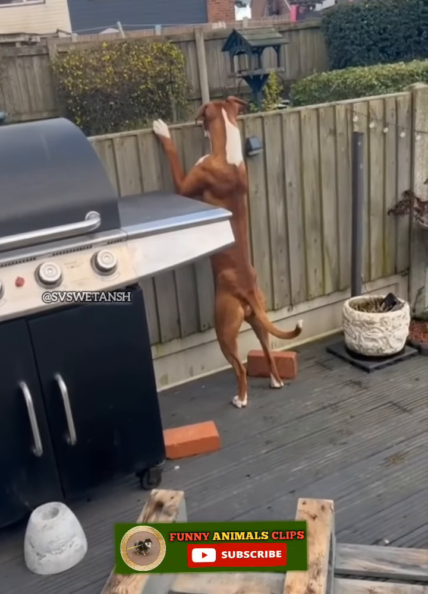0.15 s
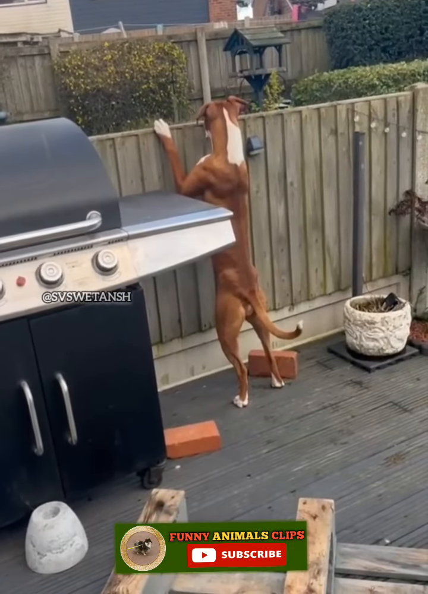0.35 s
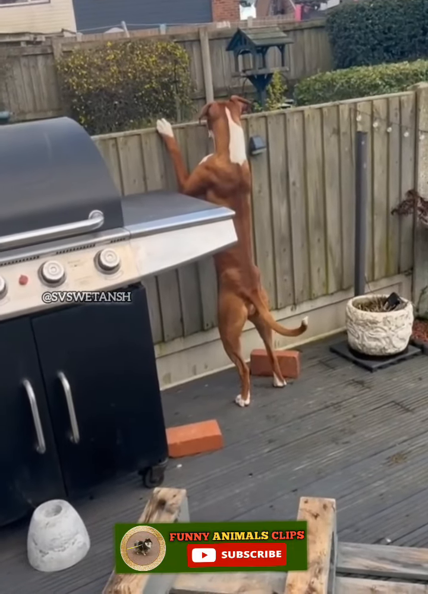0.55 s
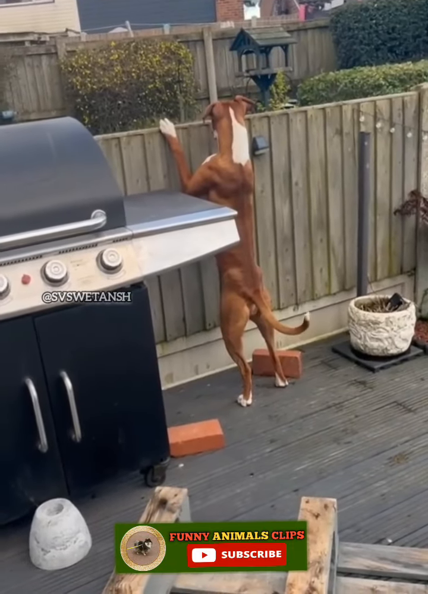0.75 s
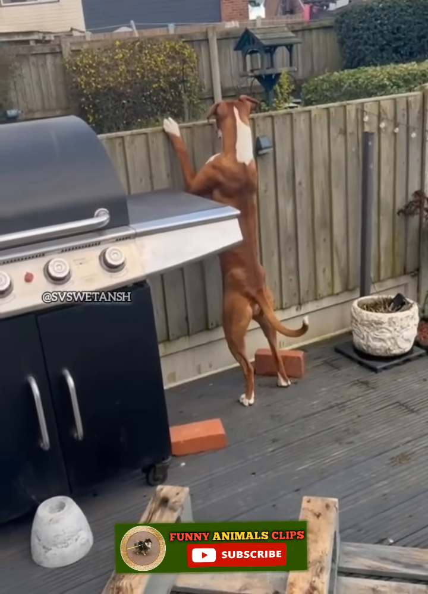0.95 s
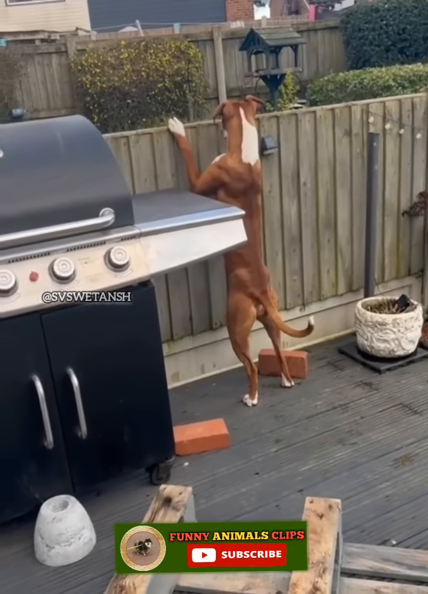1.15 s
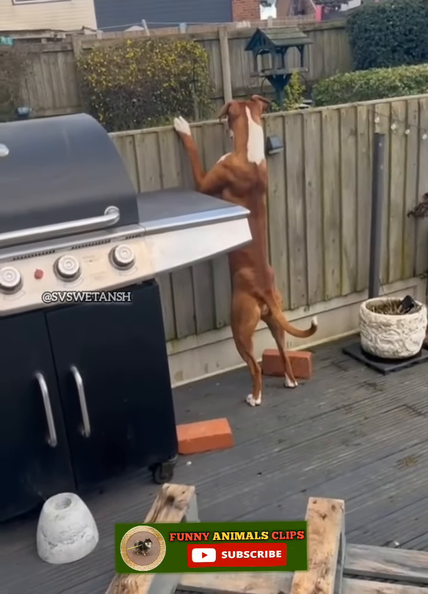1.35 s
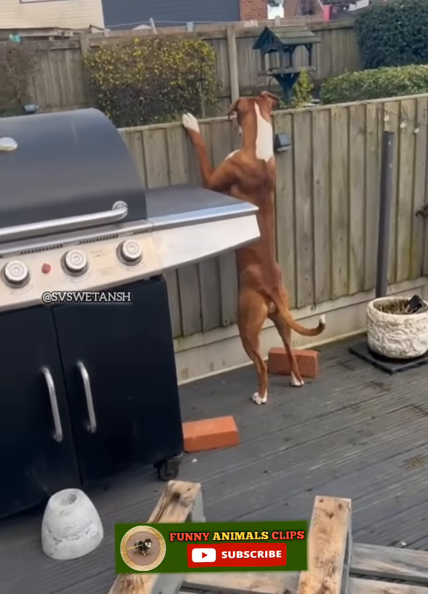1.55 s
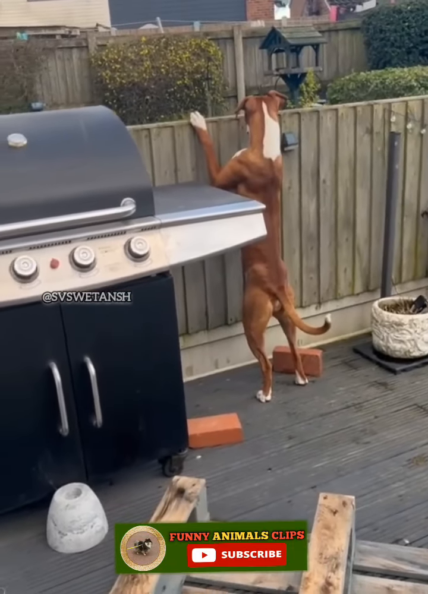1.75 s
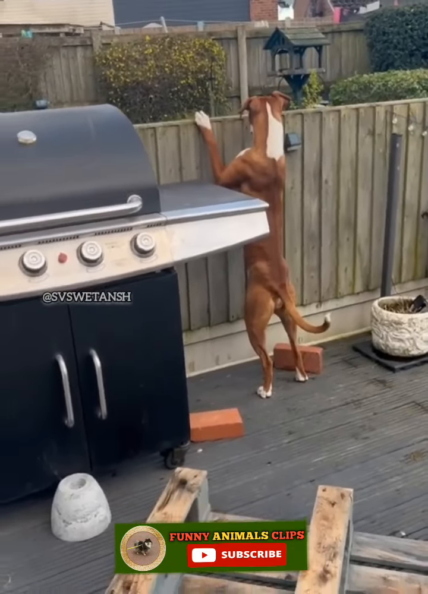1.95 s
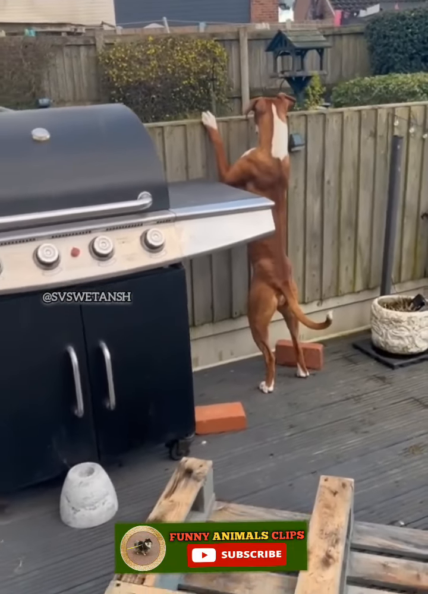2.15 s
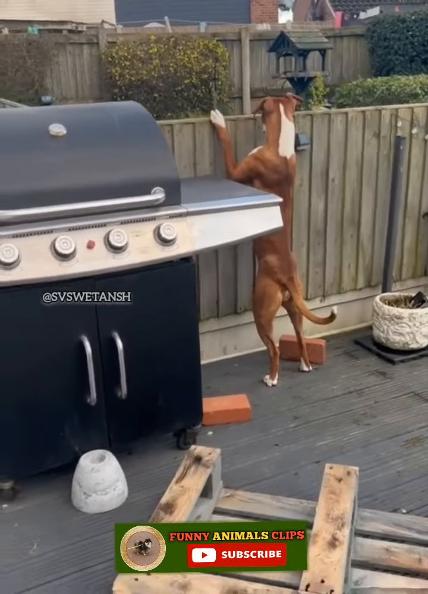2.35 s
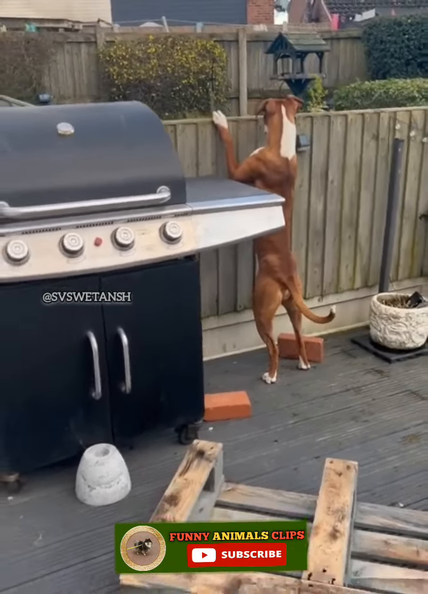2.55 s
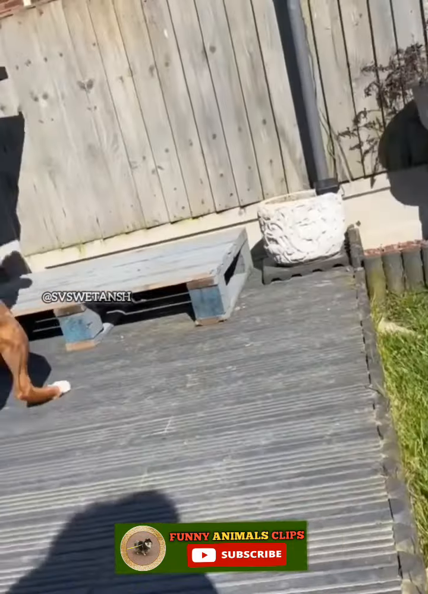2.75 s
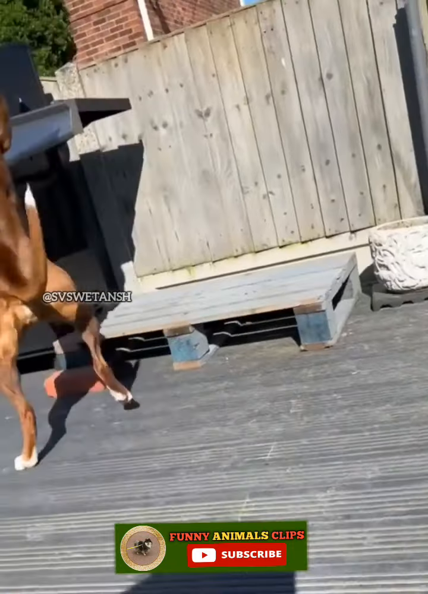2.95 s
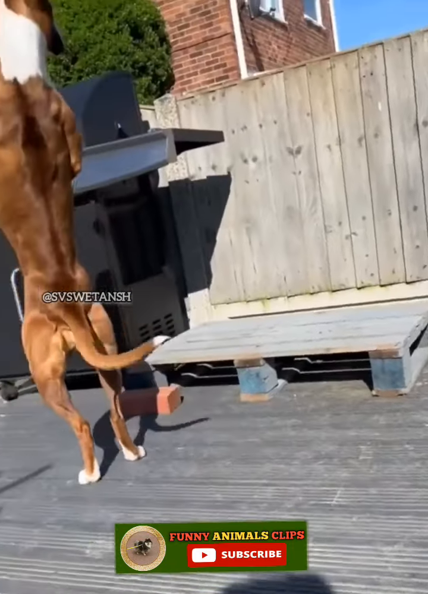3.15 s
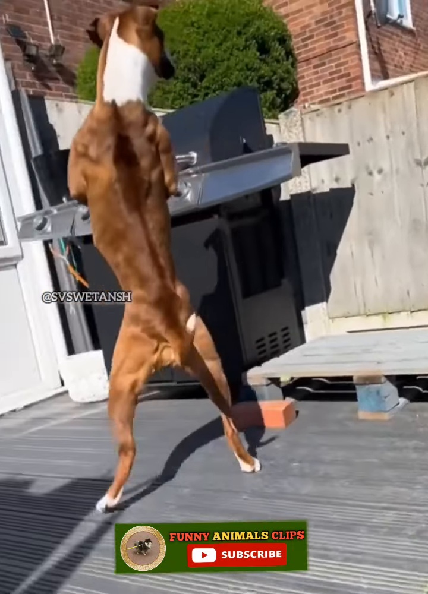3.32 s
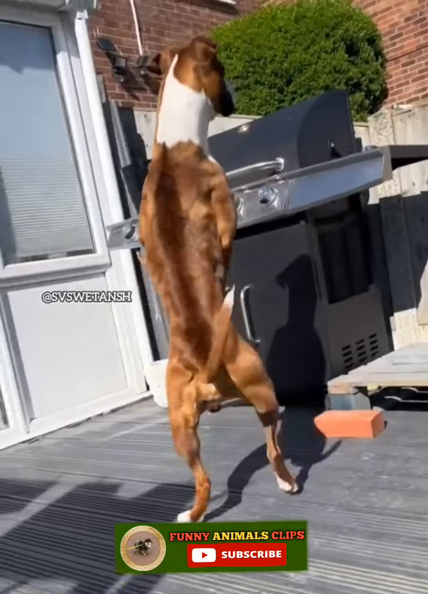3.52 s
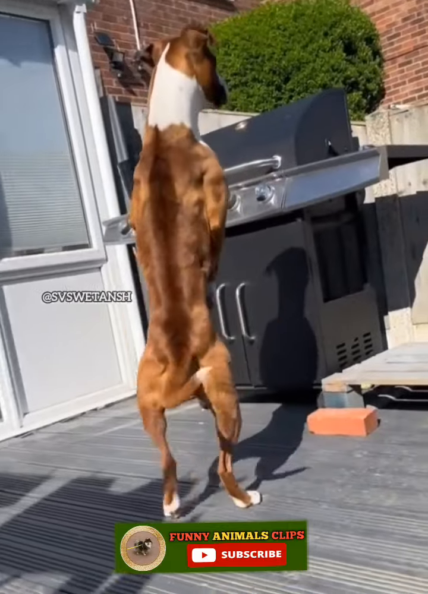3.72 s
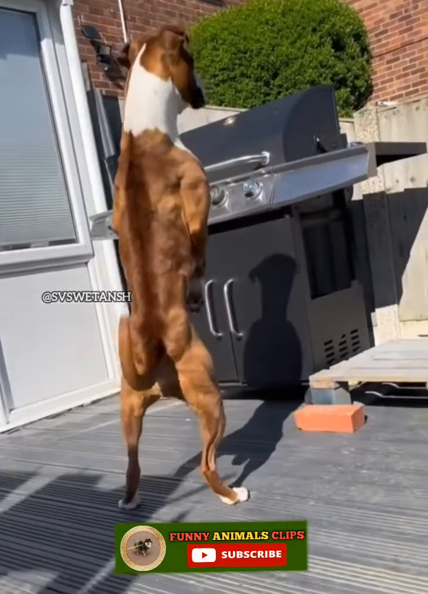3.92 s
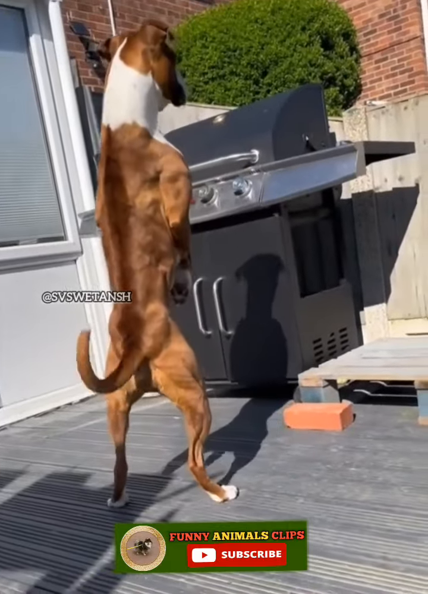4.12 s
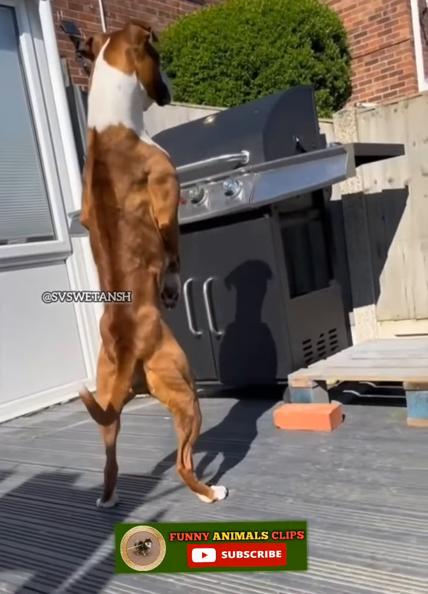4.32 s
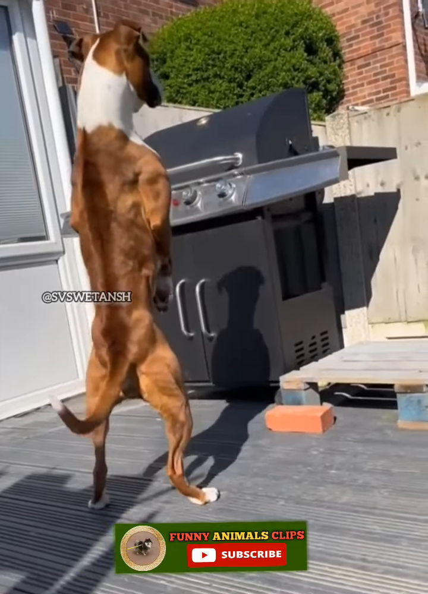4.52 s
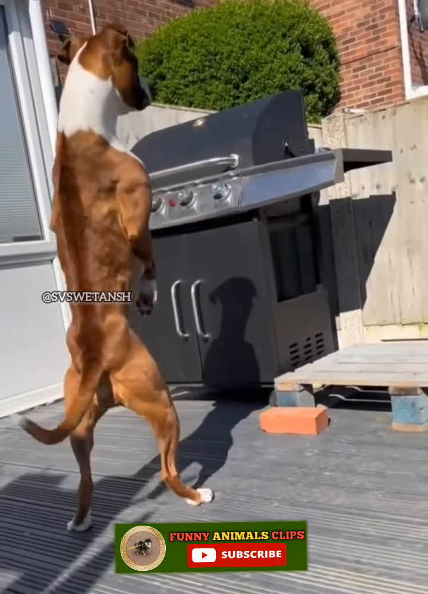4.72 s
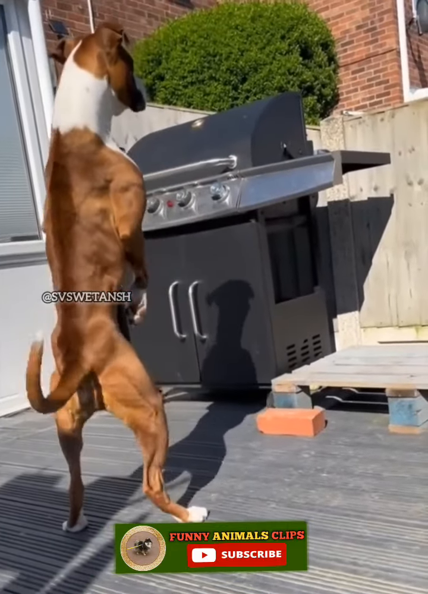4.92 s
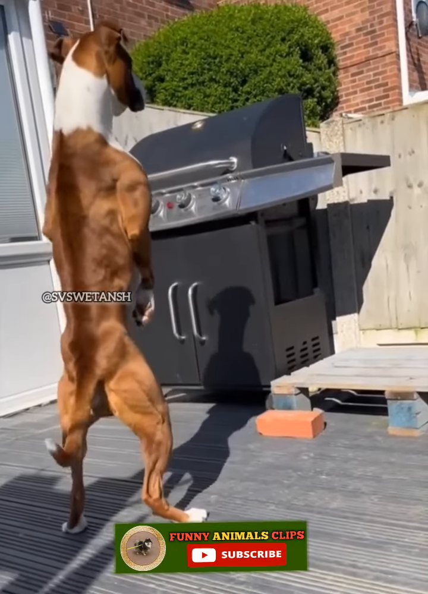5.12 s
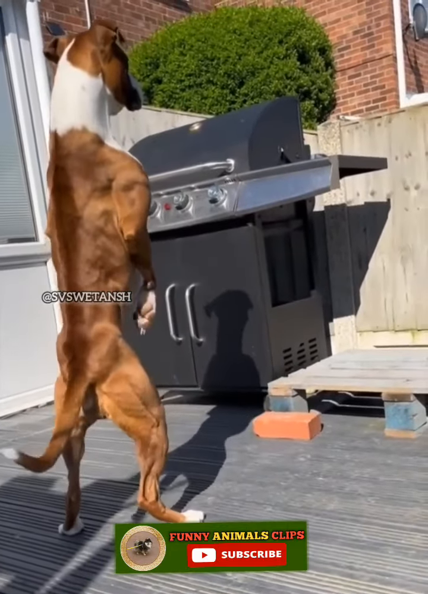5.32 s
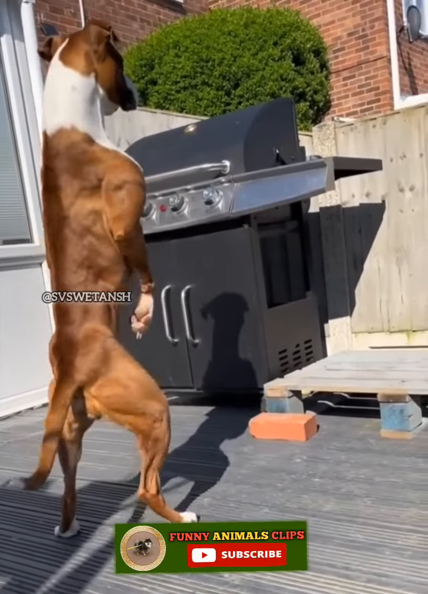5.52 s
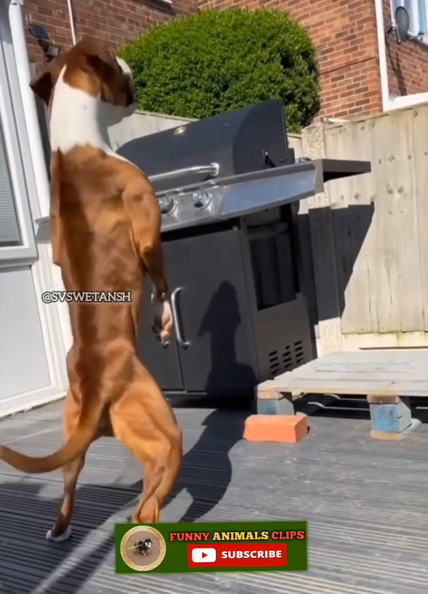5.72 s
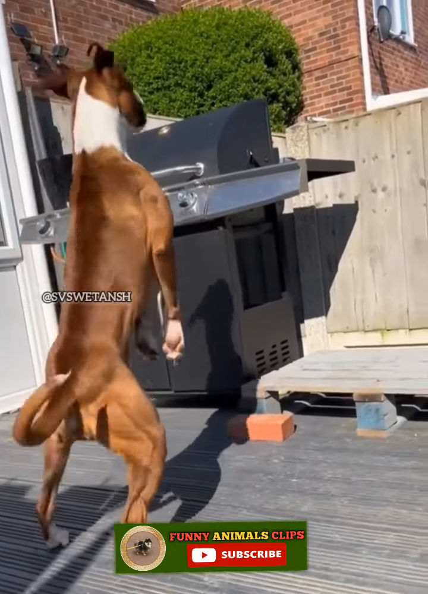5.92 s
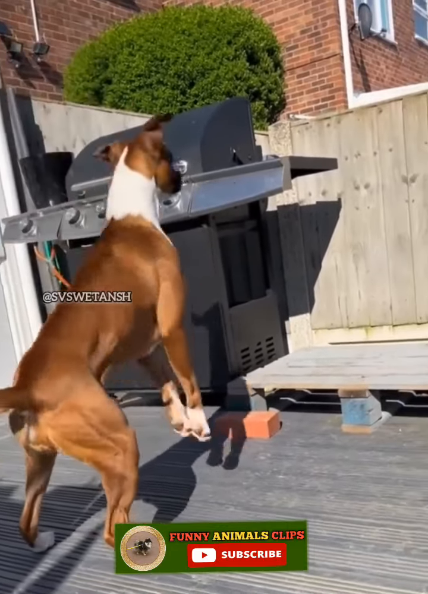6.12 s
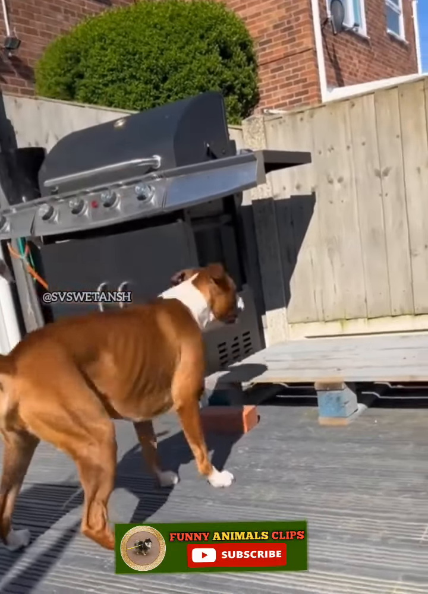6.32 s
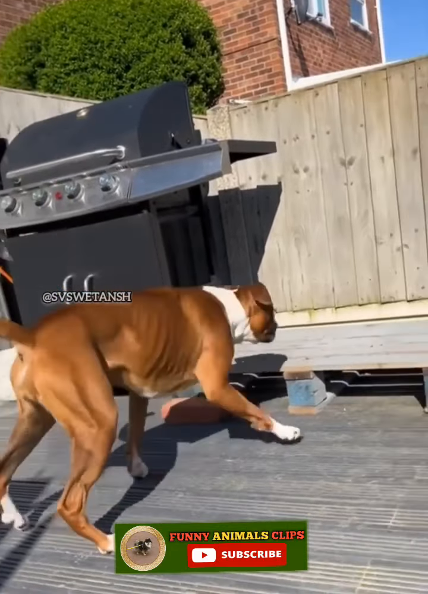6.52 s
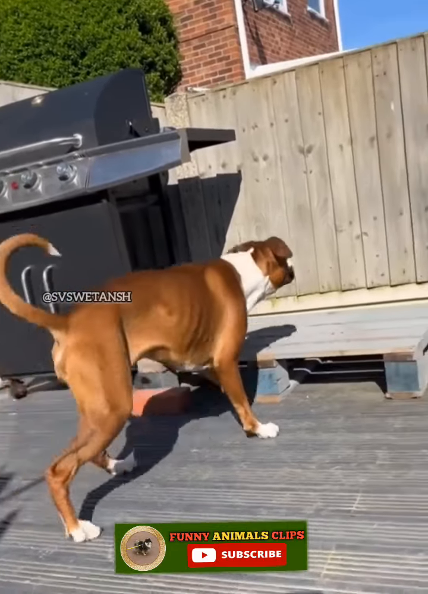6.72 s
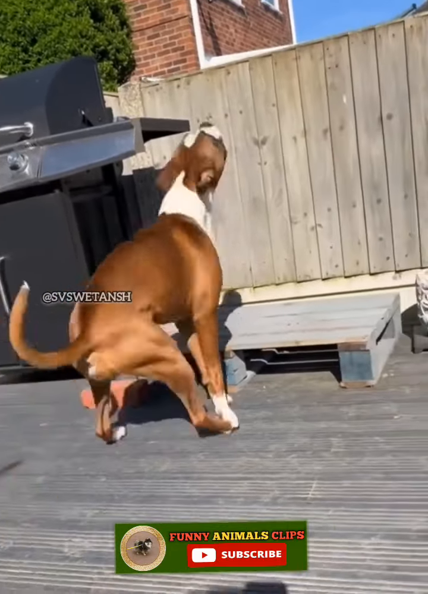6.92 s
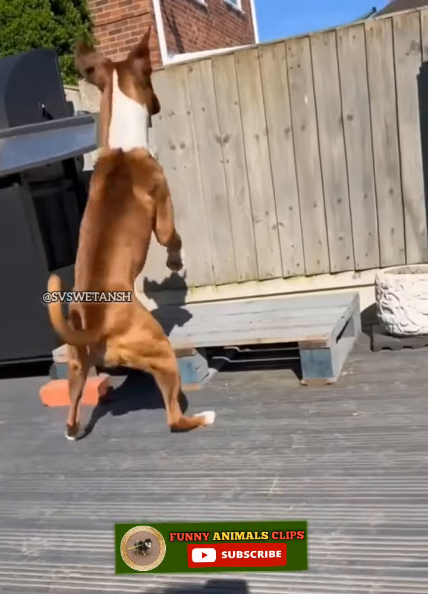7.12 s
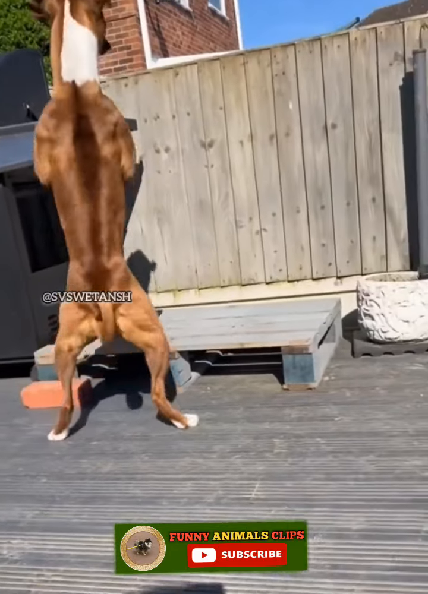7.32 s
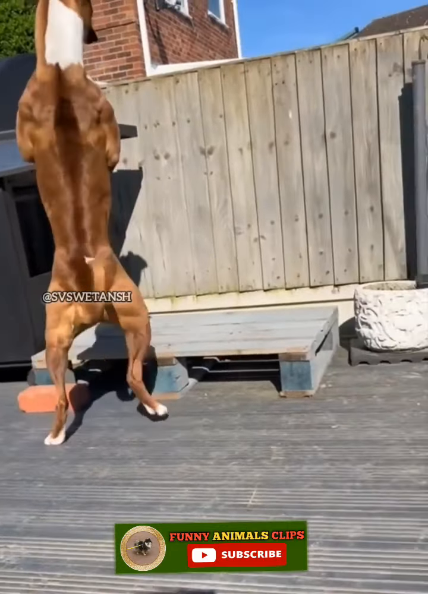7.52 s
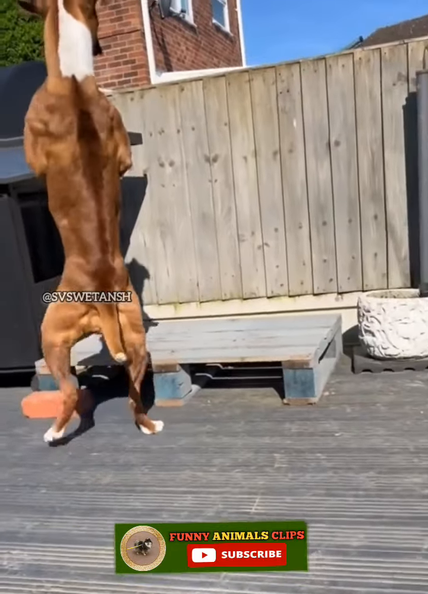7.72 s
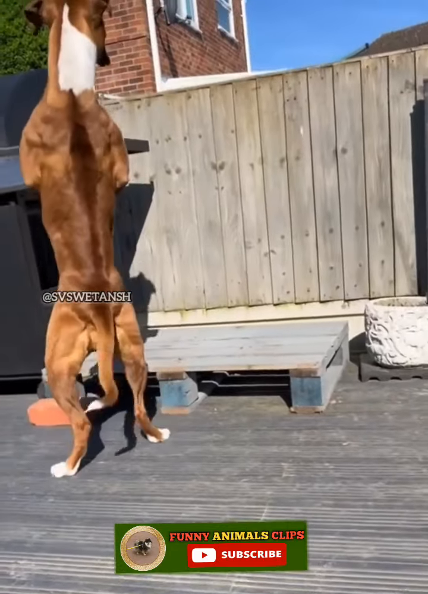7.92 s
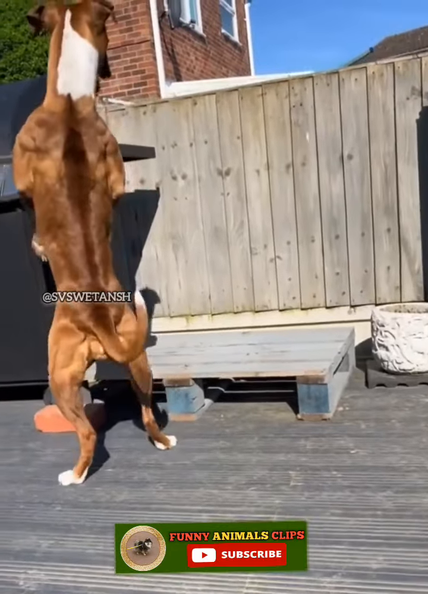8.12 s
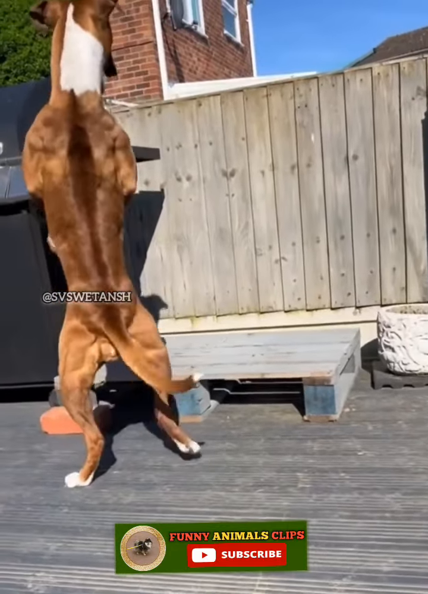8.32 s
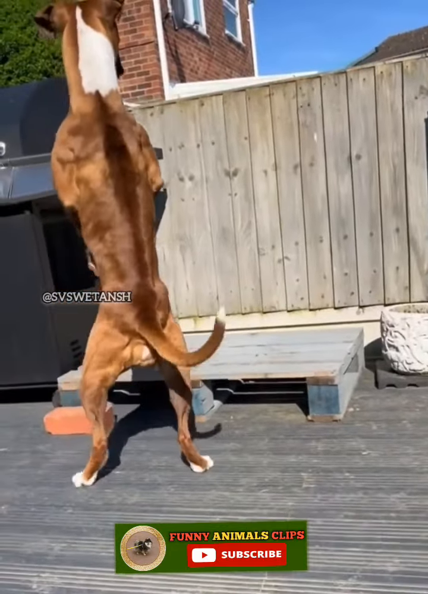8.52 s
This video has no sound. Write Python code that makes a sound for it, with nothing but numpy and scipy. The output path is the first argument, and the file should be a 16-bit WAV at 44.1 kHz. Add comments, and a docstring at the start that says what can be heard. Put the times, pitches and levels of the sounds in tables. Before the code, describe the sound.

Distant falling bird whistles and a soft wind rumble accompany light paw taps and scrapes on wood. After a short dip to silence, a nearby dog clatters and thuds across deck boards over a quiet steady hum. A muffled woof and a few breathy huffs lead to two loud barks about a second apart, then more steps, a softer woof and a huff. The yard adds a short echo.

```python
"""A dog stands on its hind legs on a wooden garden deck. First it peers over the fence, paws tapping and
scuffing, while birds whistle and buzz in a light breeze. After a gust the sound fades out and returns
by the house, over a low hum. There the dog hops about, claws clacking and boards booming, gives a muffled
woof and hoarse huffs, then barks twice, loudly. One more woof and a huff come among the last heavy steps.
Fence and house wall answer throughout."""
import sys
import numpy as np
from scipy import signal
from scipy.fft import rfft, irfft, next_fast_len
from scipy.io import wavfile
from scipy.ndimage import uniform_filter1d, map_coordinates

SR = 44100
rng = np.random.default_rng(int(sys.argv[2]) if len(sys.argv) > 2 else 0)


def inscribe(sig):
    """Save sig as 16-bit PCM at rate SR to the path in sys.argv[1].

    A 1-D sig is mono; a 2-D sig holds one channel per row.
    Samples are clipped to [-1, 1] before scaling.
    """
    pcm = np.round(np.clip(np.atleast_2d(sig).T, -1, 1) * 32767)
    wavfile.write(sys.argv[1], SR, pcm.astype(np.int16))


N = 381603
TIME = np.arange(N) / SR
YARD_START_S = 2.7  # the second scene, by the house, begins
# spectrum of a sharp snap on wood: (frequency [Hz], level [dB])
SNAP = [(500, -15), (1200, -3), (4000, 1.5), (8000, -4.5), (14000, -28)]


def amp(db):
    """Decibels to gain."""
    return 10 ** (np.asarray(db) / 20)


def unit(x):
    """Scale to rms 1."""
    return x / np.sqrt(np.mean(x ** 2) + 1e-20)


def along(points, hz):
    """Read (Hz, value) points on a log frequency axis."""
    f, v = np.transpose(points)
    return np.interp(np.log(hz + 1), np.log(f + 1), v)


def wobble(rate, size):
    """A smooth random curve with `rate` knots a second."""
    knots = rng.standard_normal(int(size * rate / SR) + 4)
    return map_coordinates(knots, [np.arange(size) * rate / SR])


def filtered(x, response):
    """Equalise x by a gain given as a function of frequency."""
    n = x.shape[-1]
    m = next_fast_len(n + 8192)
    return irfft(rfft(x, m) * response(np.fft.rfftfreq(m, 1 / SR)), m)[..., :n]


def dull(x, edge_hz):
    """Low-pass: a softer contact loses its treble."""
    return filtered(x, lambda f: 1 / np.sqrt(1 + (f / edge_hz) ** 4))


def resonate(x, modes):
    """Pass x through steep-sided resonances: (centre [Hz], width [Hz], gain [dB])."""
    return filtered(x, lambda f: sum(amp(db) * (1j * f * w / (c * c - f * f + 1j * f * w)) ** 2
                                     for c, w, db in modes))


def noise(spectrum, size):
    """Coloured noise of rms 1."""
    return unit(filtered(rng.standard_normal(size), lambda hz: amp(along(spectrum, hz))))


def band(centre_hz, width_hz, size):
    """A noise band of rms 1 around a centre that may move."""
    phase = 2 * np.pi * np.cumsum(centre_hz * np.ones(size)) / SR
    return unit(wobble(width_hz, size) * np.sin(phase) + wobble(width_hz, size) * np.cos(phase))


def stereo_bed(spectrum, side_db):
    """Full-length stereo noise, mostly alike in both ears."""
    mid, side = noise(spectrum, N), amp(side_db) * noise(spectrum, N)
    return unit(np.array([mid + side, mid - side]))


def add(track, s, x):
    """Mix x into the track from time s."""
    start = max(0, round(s * SR))
    part = track[..., start:start + x.shape[-1]]
    part += x[..., :part.shape[-1]]


def garden(x, near_db, far_db, side_db, linger=1):
    """Deck and fence answer at once; the houses around leave a tail, which lingers for far sources."""
    # tone of the tail: (frequency [Hz], level [dB])
    colour = [(200, 9), (420, 4.5), (600, -3), (800, 2), (1400, 0), (2300, 3.5), (4000, 3), (12000, -1.5)]
    # decay of the tail at linger=1: (frequency [Hz], t60 [s])
    decay = [(100, 1), (500, 0.53), (1500, 0.64), (4000, 0.66), (12000, 0.51)]
    hz, t, spectra = signal.stft(rng.standard_normal((2, SR * 3 // 4)), SR, nperseg=256)
    tail_db = along(colour, hz)[:, None] - 60 * t / (linger * along(decay, hz)[:, None])
    tail = signal.istft(spectra * amp(tail_db), SR, nperseg=256)[1]
    t = np.arange(tail.shape[1]) / SR
    tail *= 1 - np.exp(-t / 0.011)
    near = rng.standard_normal(tail.shape) ** 3 * amp(-60 * t / 0.15) * (t > .003)
    answer = amp(near_db) * near / np.linalg.norm(near[0]) + amp(far_db) * tail / np.linalg.norm(tail[0])
    mid, side = signal.fftconvolve(x[None], answer, axes=1)[:, :N]
    # short waves differ more between left and right: (frequency [Hz], side gain [dB])
    width = [(150, -32), (600, -3), (3000, -2.5), (10000, 3.5)]
    side = filtered(side, lambda f: amp(side_db + along(width, f)))
    return np.array([x + mid + side, x + mid - side])


def breeze():
    """A light breeze rumbles and swells in one gust."""
    # wind rumble: (frequency [Hz], level [dB])
    spectrum = [(13, -43), (22, -9), (60, 8.5), (91, -0.5), (129, 0.5), (198, -8.5), (285, -12.5),
                (400, -40), (520, -73), (880, -120)]
    gust_db = 12.5 * np.exp(-((TIME - 2.147) / 0.21) ** 2)
    return amp(-53.5 + gust_db + 2.6 * wobble(14, N)) * stereo_bed(spectrum, side_db=-17)


def distant_rush():
    """A wide, far-off rush that ebbs unevenly."""
    # tone of the rush: (frequency [Hz], level [dB])
    spectrum = [(120, -70), (200, 2.5), (500, 0), (1000, -2.5), (2000, -12), (3500, -19.5), (6500, -26),
                (9000, -29.5), (13500, -40), (15500, -46)]
    # its envelope: (time [s], level [dB])
    envelope = [(0, -51), (.35, -52), (.7, -53), (1, -50.5), (1.35, -59), (2.1, -55), (2.45, -61)]
    db = np.interp(TIME, *np.transpose(envelope)) + 0.11 * wobble(36, N)
    return amp(db) * stereo_bed(spectrum, side_db=-6)


def yard_air():
    """The low, almost mono ambience of the sheltered yard."""
    # tone of the yard: (frequency [Hz], level [dB])
    spectrum = [(22, -26.5), (50, 4.5), (75, 6), (160, -2.5), (300, -5.5), (600, -16), (1200, -28),
                (2500, -41.5), (5000, -46), (14000, -57.5)]
    # its envelope: (time [s], level [dB])
    envelope = [(2.7, -57.5), (3.1, -49.5), (4.3, -51.5), (5.5, -54.5), (7.7, -53), (8.65, -45.5)]
    db = np.interp(TIME, *np.transpose(envelope)) + 1.7 * wobble(11, N)
    return amp(db) * stereo_bed(spectrum, side_db=-30)


def machine_hum():
    """A machine's steady hum swells in as the yard scene opens."""
    # harmonics: (multiple of the pitch, level [dB])
    harmonics = [(1, 3), (2, -11.5), (3, -22.5)]
    pitch_hz, swell_s = 118.2, 0.87
    phase = 2 * np.pi * np.cumsum(pitch_hz * (1 + 0.0025 * wobble(1.1, N))) / SR
    swell = np.clip((TIME - YARD_START_S) / swell_s, 0, 1)
    return amp(-54) * swell * sum(amp(db) * np.sin(k * phase) for k, db in harmonics)


def birds():
    """Gliding, mostly falling whistles with a hoarse edge, and buzzes among them."""
    # whistles: (start [s], length [s], opening pitch [Hz], closing pitch [Hz], level [dB])
    whistles = [(0.528, 0.35, 2550, 1680, -60), (1.033, .63, 4043, 1953, -54),
                (1.741, .5, 3960, 1750, -51.5), (2.344, 0.07, 2715, 2960, -53.5),
                (5.37, 0.29, 2320, 2193, -66), (6.078, 0.22, 2570, 2265, -71),
                (7.168, 0.15, 2020, 1974, -63)]
    # buzzy notes: (middle [s], length [s], centre [Hz], half-width [Hz], level [dB])
    buzzes = [(0.022, 0.04, 3380, 250, -57), (0.443, 0.32, 6670, 447, -63), (0.578, 0.19, 7840, 250, -67.5),
              (0.621, 0.21, 8800, 276, -64.5), (0.829, 0.2, 4320, 820, -56.5),
              (1.601, 0.079, 4350, 985, -62), (1.772, 0.13, 3630, 1280, -54),
              (2.027, 0.26, 8130, 350, -71.5), (2.145, 0.21, 4700, 450, -60), (2.362, 0.73, 4500, 706, -70)]
    hold, attack = 0.072, 0.19  # shares of a whistle: opening pitch held, level rising
    track = np.zeros(N)
    for s, length, start_hz, end_hz, level_db in whistles:
        n = int(length * SR)
        progress = np.linspace(0, 1, n)
        hz = start_hz * (end_hz / start_hz) ** np.interp(progress, [hold, 1], [0, 1])
        rise_db = np.interp(progress, [0, attack], [-10, 0])
        fall_db = -12 * np.interp(progress, [attack, 1], [0, 1]) ** 2
        phase = 2 * np.pi * np.cumsum(hz * (1 + .009 * wobble(220, n))) / SR
        tremble_db = 2.8 * wobble(70, n)
        tone = np.sin(phase) + amp(-8) * band(hz, 380, n)
        add(track, s, amp(level_db + rise_db + fall_db + tremble_db) * tone)
    for s, length, centre_hz, half_width_hz, db in buzzes:
        n = int(length * SR)
        buzz = unit(resonate(rng.standard_normal(n), [(centre_hz, 2 * half_width_hz, 0)]))
        add(track, s - length / 2, amp(db + 2.2 * wobble(75.5, n)) * np.sqrt(np.hanning(n)) * buzz)
    return track


def close_click():
    """One tiny click, too close to raise an echo."""
    track, n = np.zeros(N), int(0.0076 * SR)
    add(track, 5.35, amp(-48) * np.hanning(n) * band(centre_hz=5150, width_hz=3150, size=n))
    return track


def scuffs():
    """Pads drag over gritty wood, and now and then something ticks sharply."""
    # paw drags: (middle [s], length [s], relative level [dB], treble edge [Hz])
    drags = [(0.222, .07, -47, 14000), (0.868, 0.32, -57.5, 7840), (1.069, 0.05, -58, 11800),
             (1.6, .07, -57, 6460), (1.718, 0.11, -42.5, 5800), (1.79, 0.11, -51.5, 12700),
             (2.171, 0.32, -62, 6840), (2.815, 0.15, -61.5, 2900), (3.193, 0.18, -69, 4380),
             (3.291, 0.083, -59, 9400), (3.536, 0.17, -53, 6860), (3.681, 0.23, -62.5, 4440),
             (4.907, 0.087, -54, 13900), (5.627, .13, -47.5, 6070), (5.719, 0.17, -49.5, 6260),
             (6.306, 0.32, -57, 5470), (6.445, 0.037, -61.5, 8010), (6.77, 0.12, -56, 8400),
             (6.853, 0.13, -47.5, 5800), (7.223, 0.21, -58, 9900)]
    # pad on wood: (frequency [Hz], level [dB])
    scrape = [(700, -10), (2000, -2), (3200, -9.5), (4700, -6), (9500, -15), (14000, -19), (15500, -19.5)]
    # sharp ticks: (time [s], level [dB], t60 [s])
    ticks = [(0.195, -42, 0.01), (0.829, -36, 0.023), (6.325, -31.5, 0.022)]
    track, t = np.zeros(N), np.arange(SR // 10) / SR
    for s, length, db, edge_hz in drags:
        n = int(length * SR)
        grit_db = 3.6 * wobble(260, n)
        add(track, s - length / 2, amp(db - 2 + grit_db) * np.hanning(n) * dull(noise(scrape, n), edge_hz))
    for s, db, t60 in ticks:
        add(track, s, amp(db - 60 * t / t60) * noise(SNAP, len(t)))
    return track


def board_thuds():
    """The dog's full weight slowly bends a board, which booms at its own pitch."""
    # landings: (time [s], level [dB], pitch [Hz], t60 [s])
    landings = [(3.143, -28, 127.8, .2), (3.401, -35.5, 228, 0.15), (3.505, -27.5, 120, 0.16),
                (3.543, -34, 234, 0.17), (3.613, -30.5, 242, .09), (3.903, -36, 221, 0.098),
                (4.712, -27, 268, 0.1), (7.967, -34, 120.5, 0.12), (8.249, -29.5, 119.6, 0.15),
                (8.407, -19, 229, 0.041)]
    attack_s, overtone_ratio = 0.0037, 1.55
    track, t = np.zeros(N), np.arange(SR // 4) / SR
    for s, db, hz, t60 in landings:
        phase = 2 * np.pi * hz * t + .4 * wobble(80, len(t))
        ring = np.sin(phase) + amp(-11.5) * np.sin(overtone_ratio * phase)
        add(track, s, amp(db - 60 * t / t60) * (1 - np.exp(-t / attack_s)) * ring)
    return track


def plank_knocks():
    """Under a heavy step a loose plank chatters on its joist, then rings out with a hollow knock."""
    # knocks: (time [s], level [dB], pitch of the main mode [Hz])
    knocks = [(0.829, -41, 738), (3.131, -26.5, 866), (3.393, -42, 527), (3.492, -30, 890),
              (7.641, -42.5, 842), (7.953, -36, 930), (8.234, -29, 843), (8.284, -36, 784),
              (8.517, -30, 919), (8.55, -28.5, 898), (8.588, -32.5, 909)]
    # plank modes, main one first, transposed for each knock: (frequency [Hz], level [dB], t60 [s])
    modes = [(855, 0, 0.06), (1212, -6.5, 0.053), (1586, -10, 0.026), (2326, -17, .03),
             (3230, -18.5, 0.041), (4440, -22.5, .025), (658, -14, 0.11), (938, -14.5, 0.058)]
    attack_s, chatter_s = 0.0012, 0.01
    track, t = np.zeros(N), np.arange(SR // 8) / SR
    for s, level_db, pitch_hz in knocks:
        ring, transpose = np.zeros(len(t)), pitch_hz / modes[0][0]
        for hz, db, t60 in modes:
            phase = 2 * np.pi * (hz * transpose * t + rng.random()) + .6 * wobble(260, len(t))
            ring += amp(db + rng.normal(0, 1) - 60 * np.maximum(t - chatter_s, 0) / t60) * np.sin(phase)
        add(track, s, amp(level_db) * ring * (1 - np.exp(-t / attack_s)))
    return track


def paw_steps():
    """One claw snaps down and the others follow, while the paw's weight thumps the boards."""
    # steps on fence and deck: (time [s], relative claw level [dB], relative thump [dB], treble edge [Hz])
    steps = [(0.196, -38, -62, 4000), (0.209, -22.5, -39, 1670), (0.217, -31, -45, 9700),
             (0.251, -29, -46, 900), (0.396, -45, -47, 1100), (0.455, -38, -48, 1600),
             (0.493, -34, -48, 990), (0.774, -43, -49.5, 900), (0.831, -59, -47, 2500),
             (0.992, -44, -56, 900), (1.02, -37.5, -47, 1800), (1.071, -37, -44, 2470),
             (1.413, -50.5, -49, 1290), (1.702, -63, -48.5, 4060), (2.937, -46.5, -45.5, 2830),
             (2.975, -72, -52.5, 3500), (3.088, -60, -39, 1460), (3.13, -21.5, -33.5, 6640),
             (3.243, -43, -51, 2120), (3.391, -47.5, -41, 1270), (3.453, -26, -44.5, 1900),
             (3.492, -26, -35.5, 12300), (3.528, -43.5, -38.5, 4000), (3.633, -27, -49, 2520),
             (3.739, -40.5, -44.5, 5100), (4.713, -50.5, -33.5, 1460), (4.838, -31.5, -51.5, 1700),
             (4.912, -61, -40, 5000), (5.587, -48.5, -41, 2370), (5.674, -28.5, -34, 1000),
             (5.709, -53.5, -25.5, 1040), (6.262, -44, -42, 1920), (6.298, -44, -36.5, 2000),
             (6.312, -36, -49, 6000), (6.326, -36, -38, 5160), (6.609, -56, -36, 1204),
             (6.622, -41, -47.5, 4070), (6.666, -53.5, -45.5, 5000), (6.82, -32, -34, 4080),
             (6.851, -29, -28, 2980), (6.882, -21.5, -22.5, 1977), (7.519, -40, -63, 3570),
             (7.624, -29.5, -40.5, 13800), (7.641, -28, -37, 3990), (7.912, -43.5, -43.5, 2490),
             (7.951, -26.5, -32, 13300), (8.231, -19, -32.5, 11800), (8.282, -31, -35.5, 4960),
             (8.407, -45, -33.5, 980), (8.517, -24, -48, 2870), (8.548, -24, -36, 8740),
             (8.586, -23.5, -38.5, 12200)]
    # claws on wood: (frequency [Hz], level [dB])
    clack = [(250, -17.5), (550, -0.5), (850, -5), (1500, -4.5), (2300, -11.5), (3600, -12.5),
             (5300, -19.5), (7500, -17), (10000, -32), (13000, -37.5), (15500, -40.5)]
    # deck modes: (frequency [Hz], level [dB], t60 [s])
    deck_modes = [(79, -9, 0.11), (123.3, -7.5, 0.3), (184, 1.5, 0.066), (255.7, 2, 0.086),
                  (334.4, -1.5, 0.11), (435, -0.5, 0.092), (517.6, -5, 0.076)]
    claw_spread_s, firm_db = 0.0071, -31
    track, t = np.zeros(N), np.arange(SR // 3) / SR
    for s, claw_db, thump_db, edge_hz in steps:
        # a firm step stops dead, a light one skitters for longer
        skitter_t60 = 0.0082 * np.exp(0.3635 * (firm_db - claw_db))
        decay_db = -60 * np.maximum(t - claw_spread_s, 0) / skitter_t60
        contact = amp(2.9 * wobble(420, len(t)) + decay_db) * (1 - np.exp(-t / .002))
        snap = amp(-60 * t / 0.0069) * noise(SNAP, len(t))
        clatter = dull(amp(-11.5) * snap + amp(-10.5) * contact * noise(clack, len(t)), edge_hz)
        # each spot on the deck shares the blow differently among its modes
        modes = [(hz * rng.normal(1, .07), db + rng.normal(0, 2), t60) for hz, db, t60 in deck_modes]
        ring = sum(amp(db - 60 * t / t60) * np.sin(2 * np.pi * (hz * t + rng.random()))
                   for hz, db, t60 in modes)
        thump = ring * (1 - np.exp(-t / 0.0073))
        add(track, s, amp(claw_db) * clatter + amp(thump_db + 2) * thump)
    return track


def huffs():
    """The dog forces air through a tight throat, whose resonance sinks in each huff."""
    # huffs: (peak [s], swell [s], fall [dB/s], relative level [dB], resonance from [Hz], to [Hz])
    breaths = [(4.555, 0.085, 79.5, -33, 986, 904), (4.735, 0.085, 81, -33, 1244, 949),
               (5.156, 0.15, 150, -30, 1122, 910.5), (6.786, .125, 75.5, -38, 1012, 892),
               (8.518, 0.13, 109, -34.5, 925, 895)]
    # hoarse breath: (frequency [Hz], level [dB])
    spectrum = [(250, -33), (440, -7.5), (600, -12), (760, 0.5), (920, 3), (1200, -5), (1700, -17.5),
                (2350, -17), (3200, -34.5), (5000, -34), (7000, -52.5), (14000, -58.5)]
    sink_s, lead_s = 0.022, 0.027  # the resonance is halfway down lead_s before the peak
    track = np.zeros(N)
    for s, swell_s, fall_db_per_s, level_db, start_hz, end_hz in breaths:
        t = np.arange(-1.3 * swell_s, .22, 1 / SR)
        db = level_db - np.where(t < 0, 24.5 * (t / swell_s) ** 2, fall_db_per_s * t)
        centre_hz = end_hz + (start_hz - end_hz) * (1 - np.tanh((t + lead_s) / sink_s)) / 2
        air = amp(-6) * noise(spectrum, len(t)) + amp(-7) * band(centre_hz, 99.6, len(t))
        flutter_db = 2.3 * wobble(85, len(t))
        add(track, s + t[0], amp(db + flutter_db) * signal.windows.tukey(len(t), .1) * air)
    return track


def voice(t, pitch, db, mouth_db, teeth_db, formant_ratio, rough, formants,
          jitter, subharmonic_db, rattle_db, rattle_hz):
    """Vocal fold pulses and puffs of air ring in throat, mouth and teeth while loose tissue rattles."""
    # what the head lets out: (frequency [Hz], gain [dB])
    head_colour = [(150, -25.5), (280, -7.5), (370, 3.5), (1750, -5), (2000, -4.5), (2500, -7),
                   (3150, -10.5), (3700, -6.5), (15000, 5)]
    n, rough = len(t), np.clip(rough, 0, 1)
    phase = 2 * np.pi * np.cumsum(pitch * (1 + jitter * rough * wobble(350, n))) / SR
    # in rough stretches alternate cycles differ, which puts lines halfway between the harmonics
    pulses = sum(np.cos(k * phase) + amp(subharmonic_db) * rough * np.cos((k + .5) * phase)
                 for k in np.arange(1, 13))
    puffs = 1.5 * rng.standard_normal(n) * (1 + .9 * np.cos(phase))
    rasp = amp(4 * rough * wobble(220, n))
    # each flap of the rattle opens sharply and closes slowly
    flap = 2 * np.pi * np.cumsum(rattle_hz * (1 + .25 * wobble(60, n))) / SR
    rattle = amp(rattle_db * unit(np.sin(flap) + np.sin(2 * flap) / 2))
    source = rattle * rasp * (np.sqrt(1 - rough) * unit(pulses) + np.sqrt(rough) * puffs)
    teeth = amp(teeth_db) * resonate(source, formants[3:])
    # throat and mouth ring on a clock of their own: a faster clock raises their formants
    clock = np.cumsum(formant_ratio)
    ticks = np.arange(int(clock[-1]))
    warped = np.interp(ticks, clock, source)
    throat = np.interp(clock, ticks, resonate(warped, formants[:1]))
    mouth = amp(mouth_db) * np.interp(clock, ticks, resonate(warped, formants[1:3]))
    sound = filtered(throat + mouth + teeth, lambda hz: amp(along(head_colour, hz)))
    power = np.abs(uniform_filter1d(sound ** 2, size=int(SR / rattle_hz)))
    track = np.zeros(N)
    add(track, t[0], amp(db) * sound / np.sqrt(power + 1e-12))
    return track


def woofs():
    """Woofs held behind closed lips: a quick fluttering swell on one sagging note, then a grumble."""
    # woofs: (time [s], pitch [Hz], level [dB], mouth gain [dB], roughness [0-1], time stretch [ratio])
    calls = [(3.8, 510, -26.5, 1, .12, 1), (8.008, 512, -32, 2, .18, .8)]
    # swell, drop and tail before stretching: (offset from the woof's time [s], level [dB])
    envelope = [(-.06, -21), (-.024, 0), (0.004, -2), (.028, -3.5), (.05, -15), (.122, -17), (.14, -26),
                (.21, -29), (.24, -47)]
    # formants of the closed muzzle: (centre [Hz], width [Hz], gain [dB])
    muzzle = [(522, 150, 12), (800, 200, 1), (1270, 170, -4), (1800, 500, -30)]
    sag_hz_per_s, rough_per_db = 74, .014  # the weaker the voice, the rougher
    envelope_s, envelope_db = np.transpose(envelope)
    track = np.zeros(N)
    for s, hz, db, mouth_db, rough, stretch in calls:
        t = np.arange(stretch * envelope_s[0], stretch * envelope_s[-1], 1 / SR)
        shape_db = np.interp(t, stretch * envelope_s, envelope_db)
        track += voice(s + t, hz - sag_hz_per_s * t, db + shape_db, mouth_db, teeth_db=0,
                       formant_ratio=np.full(len(t), .97), rough=rough - rough_per_db * shape_db,
                       formants=muzzle, jitter=0.057, subharmonic_db=10.5, rattle_db=2.4, rattle_hz=44)
    return track


def barks():
    """A growl breaks into full voice; effort lifts pitch and formants while the jaw opens and shuts."""
    # each bark: (time [s], level [dB], pitch [Hz], mouth gain [dB], teeth gain [dB], roughness [0-1])
    first_bark = [(5.714, -44, 480, -2, -4, .8), (5.73, -26, 510, 0, 3, .7), (5.741, -21, 520, -3, 6, .5),
                  (5.751, -6, 535, -8, -2, .3), (5.785, -7, 610, -2, 0, .25), (5.806, -7, 595, 5, 0, .3),
                  (5.824, -8, 510, 5, 0, .22), (5.839, -13, 470, 2, 1, .45), (5.849, -24, 440, 1, 9, .8),
                  (5.885, -41, 430, 0, -3, .95)]
    second_bark = [(6.879, -37, 400, -4, -2, .9), (6.893, -21, 425, 4, -2, .6), (6.905, -17, 405, 0, 3, .3),
                   (6.937, -20, 435, -3, 9, .28), (6.949, -10, 590, -1, -2, .2),
                   (6.974, -12.5, 700, 6, -4, .3), (6.999, -13, 600, -4, -2, .15),
                   (7.018, -25, 550, -3, 3, .5), (7.045, -29, 520, -7, -2, .75),
                   (7.085, -46, 500, -5, -5, .95)]
    # formants at top pitch; one of the throat, two of the mouth, the rest at the teeth:
    # (centre [Hz], width [Hz], gain [dB])
    first_formants = [(582, 280, 5.5), (995, 185, 4), (1634, 260, -7), (2300, 160, -15.5),
                      (2594, 110, -15.5), (3680, 85, -21.5), (4300, 120, -21), (5100, 200, -25),
                      (7050, 360, -34.5), (9700, 1200, -45.5)]
    second_formants = [(624, 440, 6), (910, 83, -4), (1540, 90, 8), (2170, 100, -19.5), (2440, 110, -14.5),
                       (3300, 140, -25.5), (4180, 170, -23.5), (4620, 150, -23), (5040, 150, -27.5),
                       (7140, 580, -32), (9080, 810, -33.5)]
    # the chest growl that leads each bark: (middle [s], length [s], pitch [Hz], level [dB])
    growls = [(5.726, .035, 300, -36), (6.895, .075, 258, -31)]
    track = np.zeros(N)
    for course, formants, rattle_db in (first_bark, first_formants, 2), (second_bark, second_formants, 4.2):
        s, *columns = np.transpose(course)
        t = np.arange(s[0], s[-1], 1 / SR)
        db, pitch, mouth_db, teeth_db, rough = (np.interp(t, s, column) for column in columns)
        formant_ratio = (pitch / pitch.max()) ** 0.35
        track += voice(t, pitch, db, mouth_db, teeth_db, formant_ratio, rough, formants,
                       jitter=.055, subharmonic_db=3.5, rattle_db=rattle_db, rattle_hz=78)
    for s, length, pitch_hz, db in growls:
        n = int(length * SR)
        add(track, s - length / 2, amp(db) * np.hanning(n) * band(pitch_hz, 70, n))
    return track


def scene():
    """The dog a few steps away, the birds farther off, over the ambience of the fence, then the yard."""
    # where the dog is: (time [s], left over right [dB])
    pan = [(3.5, 0), (4.7, -0.5), (5.8, 0.9), (6.9, -1), (8.65, 0.5)]
    dog = garden(barks(), near_db=-3.5, far_db=-18, side_db=-2)
    dog += garden(woofs(), near_db=-3, far_db=-6.5, side_db=-1)
    dog += garden(huffs(), near_db=-4.5, far_db=-8.5, side_db=-1)
    footwork = paw_steps() + board_thuds() + plank_knocks() + scuffs()
    dog += garden(footwork, near_db=-9, far_db=-19, side_db=0)
    pan_db = np.interp(TIME, *np.transpose(pan))
    dog *= amp([pan_db / 2, -pan_db / 2])
    birdsong = garden(birds(), near_db=-1.5, far_db=-9, side_db=-3, linger=1.4)
    click = close_click()
    ambience = np.where(TIME < YARD_START_S, breeze() + distant_rush(), yard_air() + machine_hum())
    return dog + birdsong + click + ambience


def record(dry):
    """Gain control ducks at the barks and creeps back; the fence scene fades out; the top is cut off."""
    ceiling_db, recover_db_per_s, top_hz = -10, 5.5, 15450
    fade_span_s = [2.424, 2.636]
    power = np.abs(uniform_filter1d(np.mean(dry ** 2, axis=0), size=400))
    excess_db = np.maximum(10 * np.log10(power + 1e-12) - ceiling_db, 0)
    recovery_db = recover_db_per_s * TIME
    duck_db = np.maximum.accumulate(excess_db + recovery_db) - recovery_db
    fade = np.where(TIME < YARD_START_S, np.interp(TIME, fade_span_s, [1, 0]), 1)
    return filtered(dry * amp(-duck_db) * fade, lambda hz: hz < top_hz)


dry = scene()
out = record(dry)
inscribe(out)
```